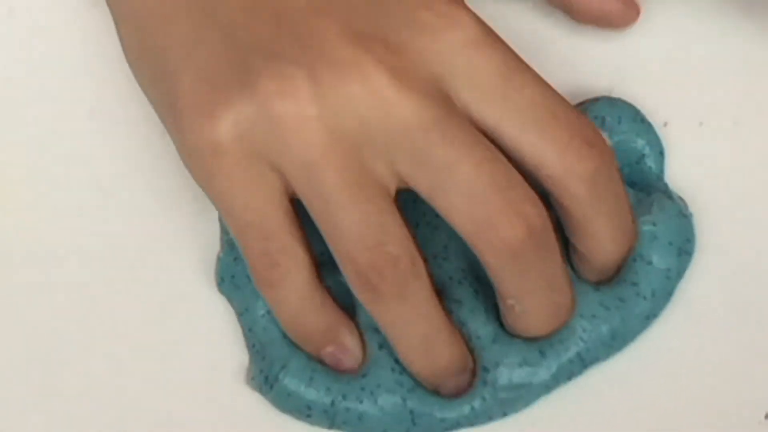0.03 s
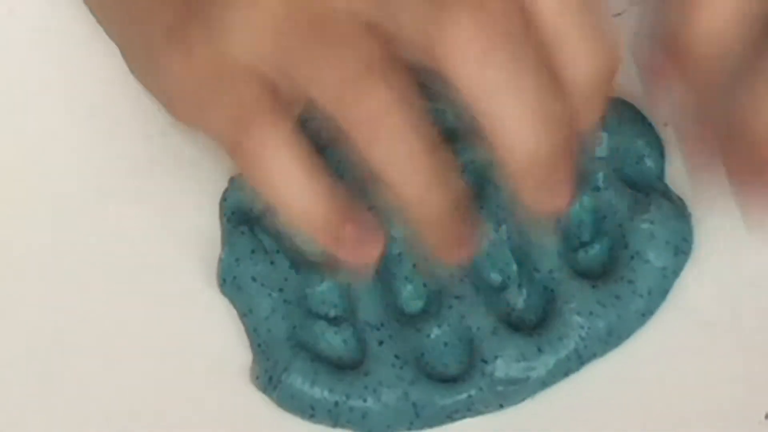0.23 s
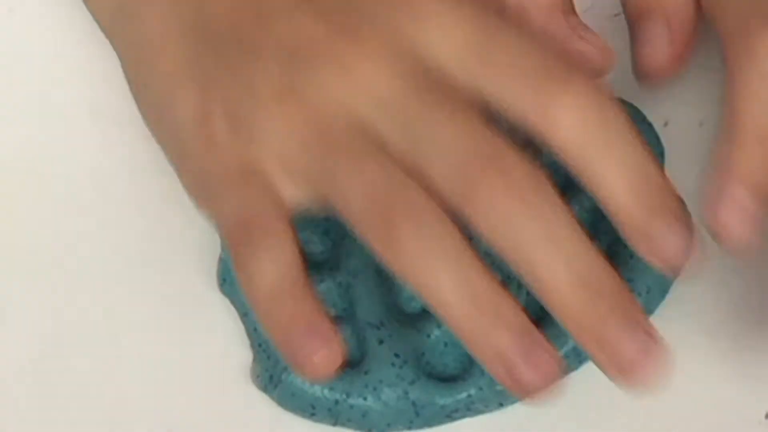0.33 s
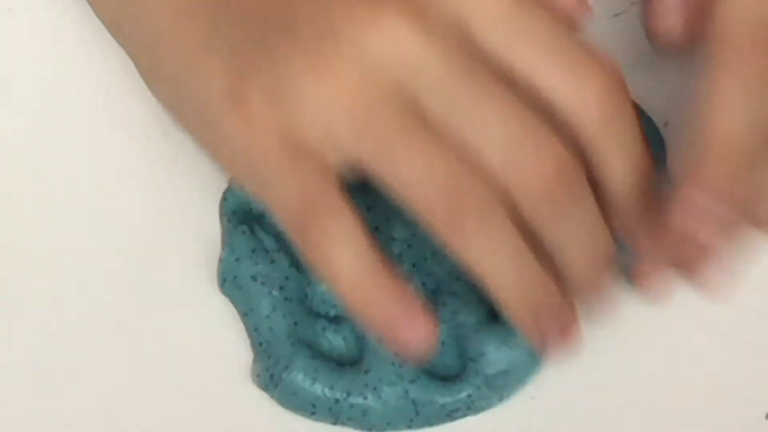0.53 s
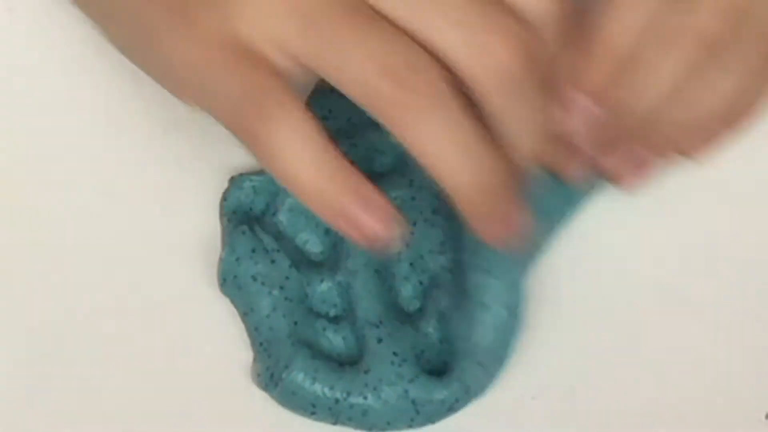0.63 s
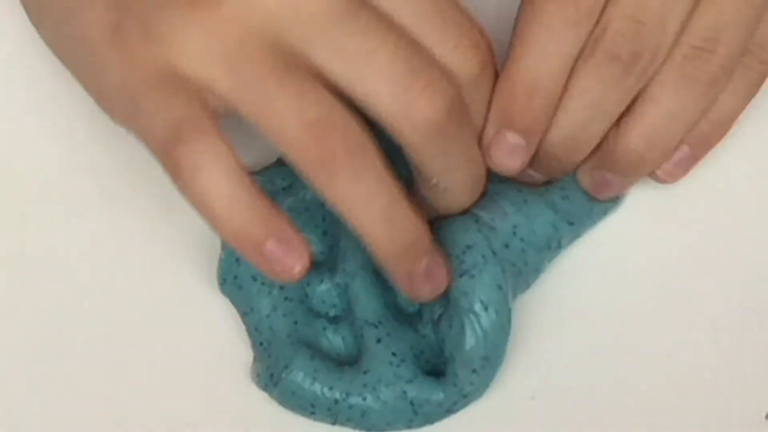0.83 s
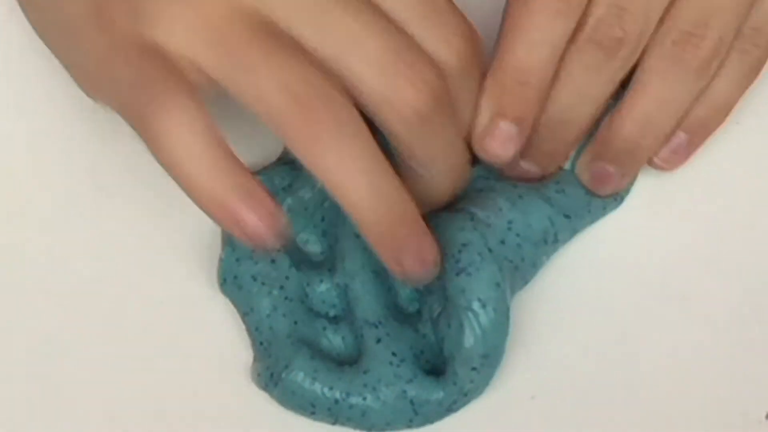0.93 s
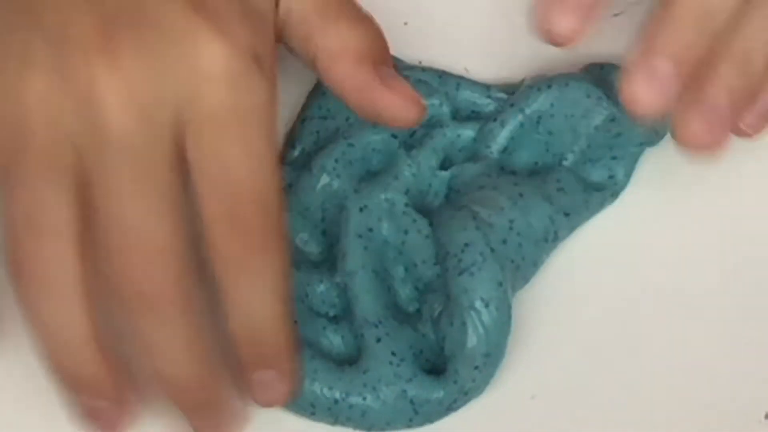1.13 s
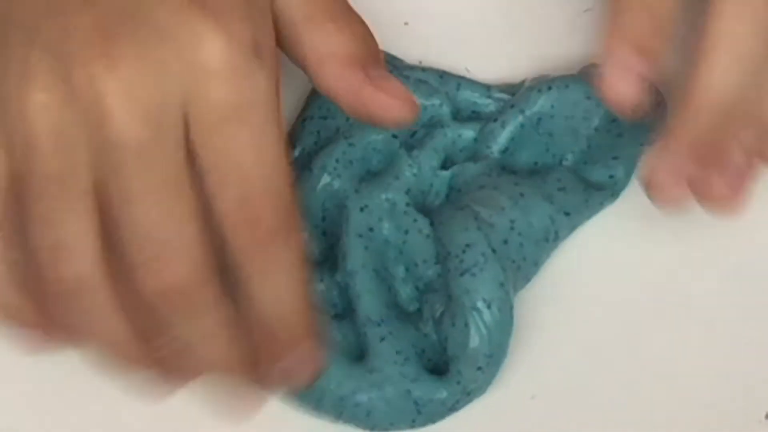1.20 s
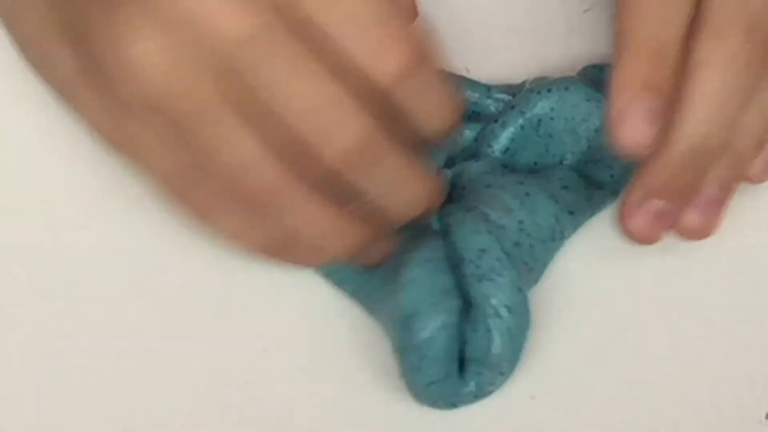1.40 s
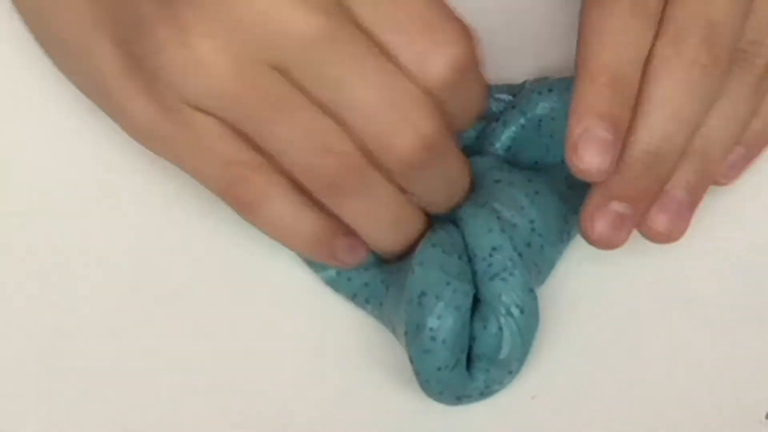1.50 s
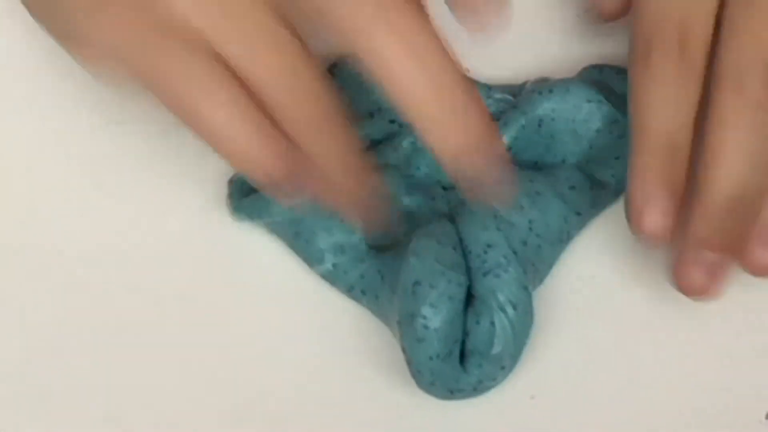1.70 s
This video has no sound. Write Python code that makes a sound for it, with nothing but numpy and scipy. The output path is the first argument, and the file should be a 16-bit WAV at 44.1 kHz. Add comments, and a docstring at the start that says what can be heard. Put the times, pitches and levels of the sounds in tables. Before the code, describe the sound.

Fingers poke and fold slime on a table: a burst of bright sticky pops, sparse muffled squelches, weaker wet clicks, and a soft thud, close microphone, quiet small room with low rumble.

```python
"""A low room rumble and hum come first; then a cluster of wet pops breaks out from soft slime.
Air pockets burst close by: a short damped ring, a noise snap of the sticky skin and a falling wet smack.
Pockets under a finger squelch through a low-pass; the table thuds in damped modes under them.
Short soft noise swells, some just before a pop or squelch, and faint kneading are sparse random grains
in bands; a small room adds reflections and a short tail."""
import sys
import numpy as np
from scipy import signal
from scipy.fft import rfft, irfft
from scipy.io import wavfile

SR = 44100
rng = np.random.default_rng(int(sys.argv[2]) if len(sys.argv) > 2 else 0)


def to_wav(sig):
    """Store sig (one row per channel, or 1-D mono) as 16-bit WAV at the path in sys.argv[1].

    Samples outside -1..1 are clipped; the rate is SR.
    """
    pcm = np.clip(np.atleast_2d(sig), -1, 1) * 32767
    pcm = np.round(pcm).astype(np.int16)
    wavfile.write(sys.argv[1], SR, pcm.T)  # frames by channels


N = 77175


def amp(db):
    """Level to amplitude: 20 dB is a factor of ten."""
    return 10 ** (np.asarray(db) / 20)


def evened(x):
    """Power normalization: scales a signal to rms 1."""
    return x / np.sqrt(np.mean(x ** 2) + 1e-20)


def unit_hit(x):
    """Energy normalization: gives a transient the energy of 6 ms at rms 1."""
    return x / np.sqrt(np.sum(x ** 2) / (.006 * SR) + 1e-20)


def read(points, hz, axis=1):
    """Interpolation of one table column along a logarithmic frequency axis."""
    columns = np.transpose(points)
    return np.interp(np.log(hz + 1), np.log(columns[0]), columns[axis])


def add(mix, s, sound):
    """Superposition: adds a sound to the mix from time s on."""
    part = mix[round(s * SR):][:len(sound)]
    part += sound[:len(part)]


def swell(t, rise, fade):
    """Transient envelope: a quick saturating rise under an exponential decay."""
    return (1 - np.exp(-t / rise)) * np.exp(-t / fade)


def band(x, centre_hz, octaves):
    """Zero-phase band-pass filter, Gaussian in log frequency."""
    padded = 2 * len(x)
    hz = np.fft.rfftfreq(padded, 1 / SR)
    bell = np.exp(-.5 * (np.log2((hz + 1) / centre_hz) / octaves) ** 2)
    return irfft(rfft(x, padded) * bell)[:len(x)]


def fingers():
    """Impulsive excitation: each pop and squelch also pushes the table, as does each soft press."""
    # air pockets bursting at the surface: (t/s, snap fade/s, pocket f/Hz, pocket level/dB,
    # snap centre f/Hz, snap width/octaves, snap level/dB, smack level/dB, thud level/dB)
    pops = [ (0.234, .0014, 1707, -38.5, 9400, 0.17, -35, -41.5, -51),
            (0.2415, 0.0027, 2052, -31.5, 3430, 1.42, -30, -46, -34.5),
            (0.2515, 0.0033, 2410, -47, 11600, .6, -52.5, -55.5, -53.5),
            (0.2659, 0.0024, 1464, -38, 3740, 0.84, -34.5, -55, -53.5),
            (0.2918, 0.0013, 1850, -53.5, 4500, 0.32, -53.5, -101, -66),
            (0.79, 0.0035, 3646, -51, 6090, 0.42, -43, -58.5, -78),
            (0.8136, 0.003, 7050, -59, 5820, 0.29, -67.5, -88, -77),
            (0.8569, .003, 1650, -69.5, 4940, .4, -66, -70.5, -73),
            (0.8803, 0.0065, 1256, -84, 6600, 0.47, -58, -48, -52.5),
            (1.0176, 0.0087, 1336, -50.5, 3180, 0.67, -51, -58.5, -70.5),
            (1.0260, 0.0019, 1074, -45, 3410, 1.17, -43, -45.5, -67.5),
            (1.0301, 0.0021, 945, -41.5, 1950, 0.75, -45, -59, -54.5),
            (1.0360, 0.0078, 1930, -49.5, 6200, 0.4, -53, -54, -43),
            (1.0976, 0.0023, 1900, -66.5, 12700, 0.56, -65.5, -60.5, -50),
            (1.7156, 0.02, 1064, -58, 4500, 0.68, -53.5, -52, -60),
            (1.7455, 0.006, 1800, -62, 5930, 1.3, -60.5, -70, -55.5), ]
    # pockets squeezed out under a finger: (t/s, rise/s, pocket f/Hz, pocket level/dB,
    # squelch level/dB, muffling f/Hz, smack level/dB, thud level/dB)
    squelches = [ (0.52, 0.0034, 1495, -53.5, -62, 3400, -59, -54.5),
                 (0.5309, 0.0012, 1485, -56.5, -62, 3000, -63.5, -60),
                 (0.6359, 0.0023, 1478, -51.5, -58, 3430, -61, -52.5),
                 (0.648, 0.0017, 2106, -61, -88, 3040, -76, -58),
                 (0.963, 0.00035, 1756, -56, -64, 2030, -60, -58.5),
                 (1.601, 0.0012, 702, -74.5, -84, 1540, -85, -60), ]
    # soft presses that reach the table: (t/s, thud level/dB)
    presses = [(1.2200, -43.5), (1.231, -53.5), (1.247, -57), (1.275, -60), (1.397, -62)]
    thud_lag_s = 0.0021
    out = np.zeros(N)
    t = np.arange(8192) / SR
    for sound, rows in [(pop, pops), (squelch, squelches)]:
        for s, *pocket, thud_db in rows:
            add(out, s, sound(t, *pocket))
            add(out, s + thud_lag_s, amp(thud_db) * thud(t))
    for s, thud_db in presses:
        add(out, s, amp(thud_db) * thud(t))
    return out


def pop(t, fade, pocket_hz, pocket_db, snap_hz, snap_octaves, snap_db, smack_db):
    """Sudden release: the skin snaps, the opened pocket resonates and its wet walls smack."""
    rise = .08 * fade
    pocket_rise_s, pocket_fade_s = .0003, .0016
    # every snap has a wide skirt, its level relative to the snap's own band
    crack_hz, crack_octaves, crack_db = 5100, .8, -18.5
    snap = burst(t, snap_hz, snap_octaves, rise, fade)
    snap += amp(crack_db) * burst(t, crack_hz, crack_octaves, rise, fade)
    pocket = ring(t, pocket_hz, pocket_rise_s, pocket_fade_s)
    return amp(pocket_db) * pocket + amp(snap_db) * snap + amp(smack_db) * smack(t)


def ring(t, hz, rise, fade):
    """Damped cavity resonance: an opened pocket rings for a few cycles."""
    tone = np.sin(2 * np.pi * hz * t) * swell(t, rise, fade)
    return unit_hit(band(tone, hz, octaves=.9))


def burst(t, centre_hz, octaves, rise, fade):
    """Broadband tearing: a flat random-phase spectrum, confined to one band and a short envelope."""
    phases = 2 * np.pi * rng.random(len(t) // 2 + 1)
    flat = irfft(np.exp(1j * phases), len(t))
    return unit_hit(band(flat, centre_hz, octaves) * swell(t, rise, fade))


def smack(t):
    """Frequency-dependent build-up: wet walls meet in a falling slap whose low bands rise later."""
    # bands of the slap: (centre f/Hz, width/octaves, rise/s, fade/s, relative level/dB)
    slap_bands = [(1100, .4, 0.0015, 0.0023, -1), (562.7, 0.2, 0.0033, 0.011, -0.5),
                  (318, 0.27, .01, .005, -1.5)]
    return sum(amp(db) * burst(t, hz, octaves, rise, fade)
               for hz, octaves, rise, fade, db in slap_bands)


def squelch(t, rise, pocket_hz, pocket_db, squelch_db, muffle_hz, smack_db):
    """Low-pass transmission: a covered pocket opens and the slime muffles its treble."""
    centre_hz, octaves, fade_s = 2153, 0.38, .002
    pocket = amp(pocket_db) * ring(t, pocket_hz, rise, fade_s)
    wet = amp(squelch_db) * burst(t, centre_hz, octaves, rise, fade_s)
    muffling = signal.butter(8, muffle_hz, fs=SR, output="sos")
    return signal.sosfilt(muffling, pocket + wet + amp(smack_db) * smack(t))


def thud(t):
    """Modal superposition: the table's damped low modes under a soft onset."""
    # modes of the table under the slime: (f/Hz, relative level/dB, 60 dB decay time/s)
    table_modes = [(122, -3, 0.12), (201, 4, 0.079), (252, -2, 0.1), (350, -12.5, 0.025)]
    rise_s = 0.00067
    modes = np.zeros(len(t))
    for hz, db, t60 in table_modes:
        modes += amp(db) * 1e-3 ** (t / t60) * np.sin(2 * np.pi * hz * t)
    return unit_hit(modes * (1 - np.exp(-t / rise_s)))


def noise_swells():
    """Amplitude-modulated granular noise: band-filtered random grains rise and fall in short arches."""
    # short soft noise swells, some just before a pop or squelch:
    # (t/s, length/s, centre f/Hz, width/octaves, level/dB)
    swells = [ (0.202, 0.037, 2780, 3.9, -65.5), (0.509, 0.031, 1870, .45, -65.5),
              (0.623, 0.029, 2110, 0.47, -64.5), (1.089, 0.027, 4000, 1.02, -64.5),
              (1.102, 0.024, 1650, 0.32, -62), (1.269, 0.027, 1835, 0.18, -72.5),
              (1.269, 0.031, 7010, 0.54, -91.5), (1.298, 0.098, 1459, 0.28, -81),
              (1.703, 0.04, 5300, 0.85, -64.5), ]
    grains_per_s = 10000
    out = np.zeros(N)
    t = np.arange(8192) / SR
    for s, length, hz, octaves, db in swells:
        arch = np.sin(np.pi * np.minimum(t / length, 1))
        grains = rng.standard_normal(len(t)) * (rng.random(len(t)) < grains_per_s / SR)
        add(out, s, amp(db) * arch * evened(band(grains, hz, octaves)))
    return out


def kneading():
    """Granular friction: sparse sticky grains sound faintly while the slime is pushed about."""
    # skin rubbing on slime: (t/s, level/dB)
    rubbing = [(0, -89.5), (0.448, -100.5), (.6, -89), (0.748, -78.5), (0.922, -72.5), (1.12, -93),
               (1.2, -96), (1.312, -78.5), (1.419, -99.5), (1.68, -89.5)]
    centre_hz, octaves, grains_per_s, spread_db = 1050, 0.49, 900, 1.5
    size = amp(spread_db * np.minimum(rng.exponential(1, N), 3))
    struck = rng.random(N) < grains_per_s / SR
    grains = rng.standard_normal(N) * size * struck
    level_db = np.interp(np.arange(N) / SR, *np.transpose(rubbing))
    return evened(band(grains, centre_hz, octaves)) * amp(level_db)


def room(x):
    """Convolution with a room response: discrete arrivals and a diffuse, exponentially decaying tail."""
    # diffuse tail: (f/Hz, 60 dB decay time/s, level/dB)
    tail = [(120, .25, -3.5), (300, .2, 0), (599.7, 0.23, -7), (2000, 0.16, -4.5), (5000, 0.15, -3.5),
            (9000, 0.17, -6), (15600, 0.12, -10.5)]
    # arrivals from nearby surfaces: (delay/s, gain)
    echoes = [(.0012, 0.027), (.0041, -0.34), (.0087, .22), (0.0102, 0.17)]
    onset_s = 0.015
    hz, t, z = signal.stft(rng.standard_normal(SR // 2), SR, nperseg=256)
    t60 = read(tail, hz)[:, None]
    level = amp(read(tail, hz, axis=2))[:, None]
    # evens out the energy of long and short decays
    energy_scale = np.sqrt(2 * np.log(1000) / (t60 * SR))
    z = z * np.exp(-np.log(1000) * t / t60) * level * energy_scale
    response = signal.istft(z, SR, nperseg=256)[1]
    response *= 1 - np.exp(-(np.arange(len(response)) / SR / onset_s) ** 2)
    main_arrival = (0.0022, 1)
    for delay, gain in [main_arrival] + echoes:
        add(response, delay, np.array([gain]))
    return signal.fftconvolve(x, response)[:N]


def background():
    """Stationary noise and phase modulation: shaped rumble, a wavering hum and a faint whine."""
    # rumble spectrum: (f/Hz, relative level per Hz/dB)
    rumble_spectrum = [(20, -18), (55, -16.5), (85, -15.5), (120, -5.5), (155, -8.5), (210, -1),
                       (270, -3.5), (390, -23), (600, -27.5), (850, -33.5), (1550, -33.5), (2000, -46.5),
                       (5000, -48), (16000, -55)]
    # hum and whine: (f/Hz, rms level/dB)
    hum_tones = [(119, -70.5), (1574, -91)]
    rumble_db, waver_rad = -68, 0.98  # waver is the rms phase deviation
    t = np.arange(N) / SR
    hz = np.fft.rfftfreq(N, 1 / SR)
    shaped = rfft(rng.standard_normal(N)) * amp(read(rumble_spectrum, hz))
    rumble = evened(irfft(shaped, N))
    waver = waver_rad * evened(band(rng.standard_normal(N), 2.5, 0.46))
    hum = sum(amp(db) * np.sqrt(2) * np.sin(2 * np.pi * f * t + waver) for f, db in hum_tones)
    return amp(rumble_db) * rumble + hum


def scene():
    """Linear superposition: slime and table heard through the room, over its background."""
    close_sounds = fingers() + noise_swells() + kneading()
    return (room(close_sounds) + background())[None]


def record(dry):
    """Band limitation: the microphone's bass roll-off and the recorder's upper edge."""
    low_cut_hz, edge_hz = 110, 16000
    bass_cut = signal.butter(3, low_cut_hz, "high", fs=SR, output="sos")
    thinned = signal.sosfilt(bass_cut, dry)
    treble_cut = signal.firwin(511, edge_hz, window=("kaiser", 9), fs=SR)
    return signal.oaconvolve(thinned, treble_cut[None], "same")


dry = scene()
out = record(dry)
to_wav(out)
```